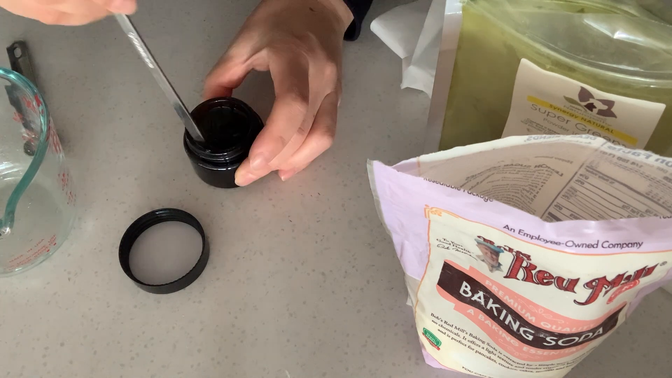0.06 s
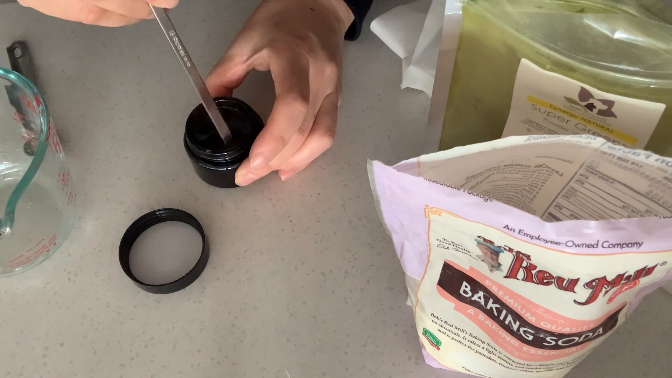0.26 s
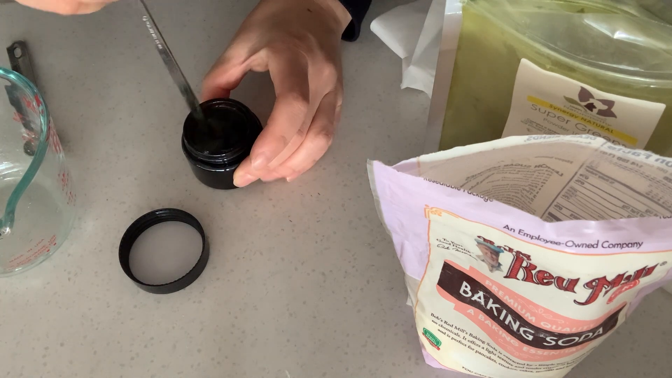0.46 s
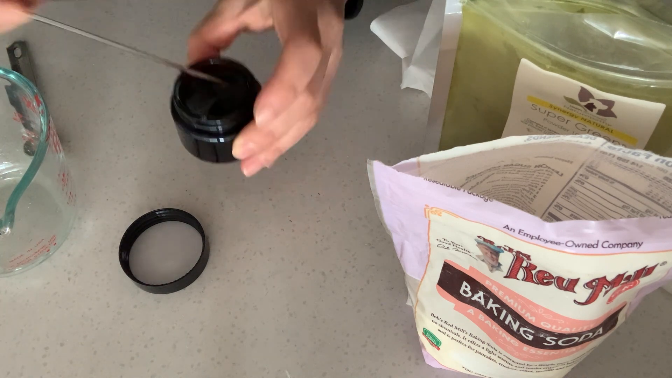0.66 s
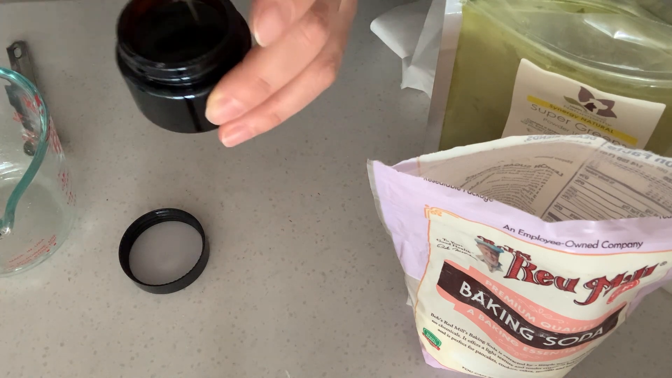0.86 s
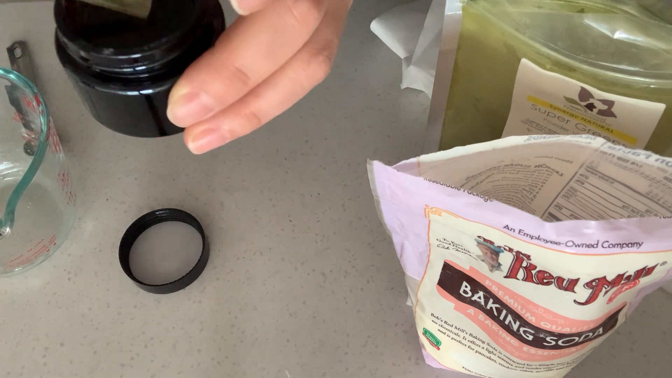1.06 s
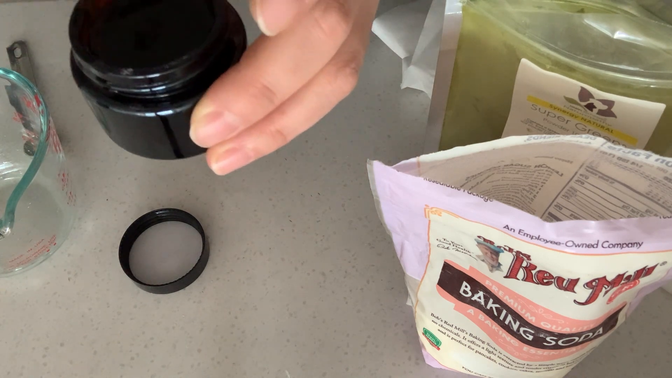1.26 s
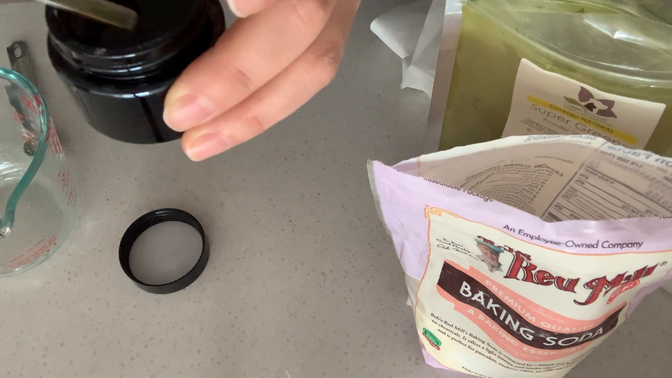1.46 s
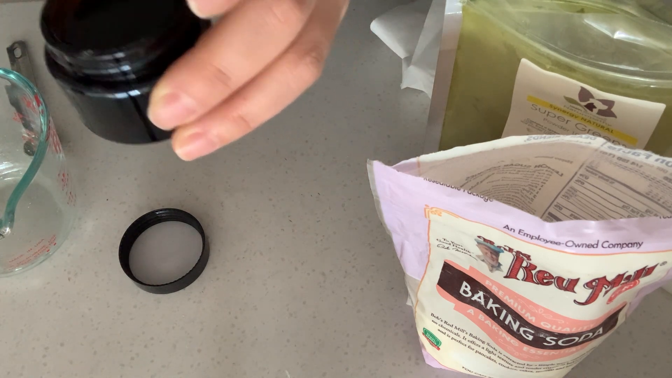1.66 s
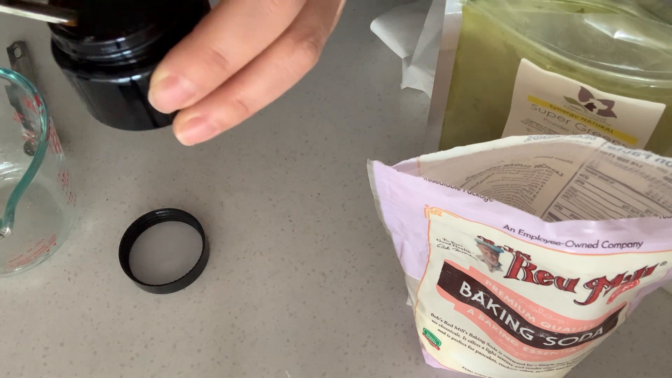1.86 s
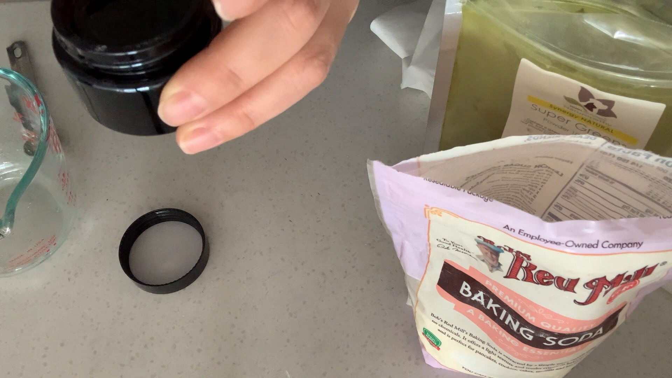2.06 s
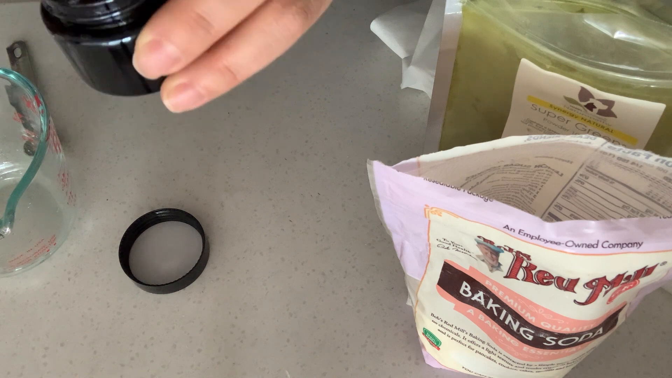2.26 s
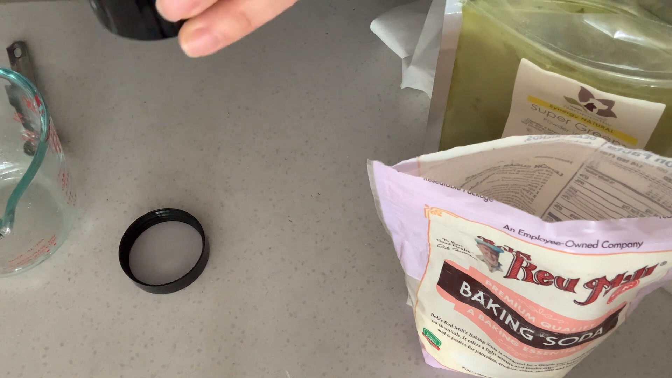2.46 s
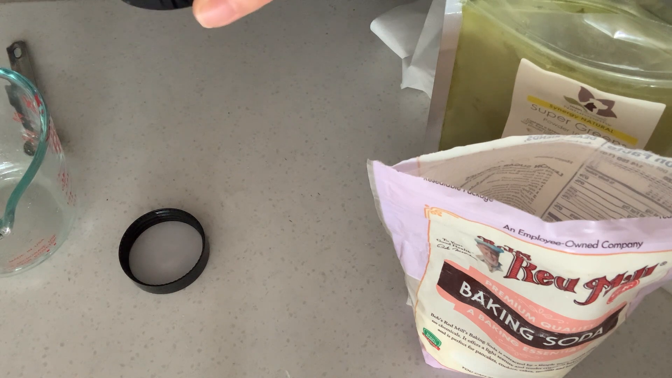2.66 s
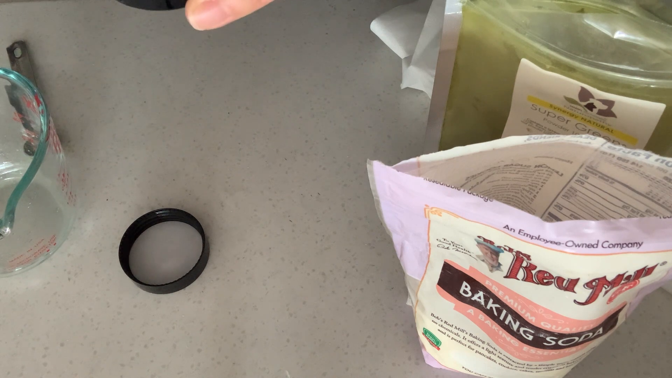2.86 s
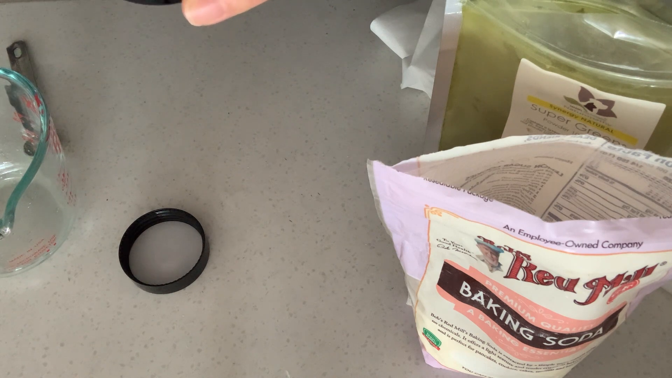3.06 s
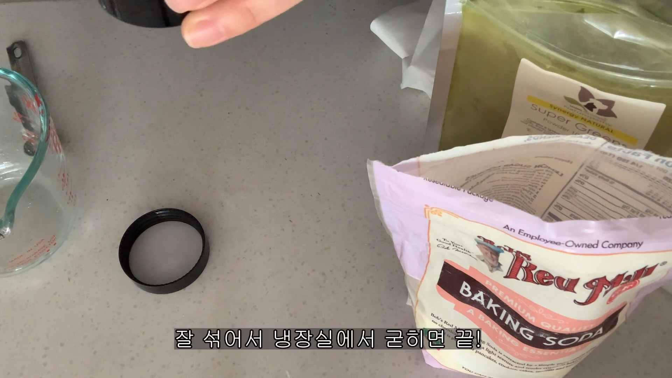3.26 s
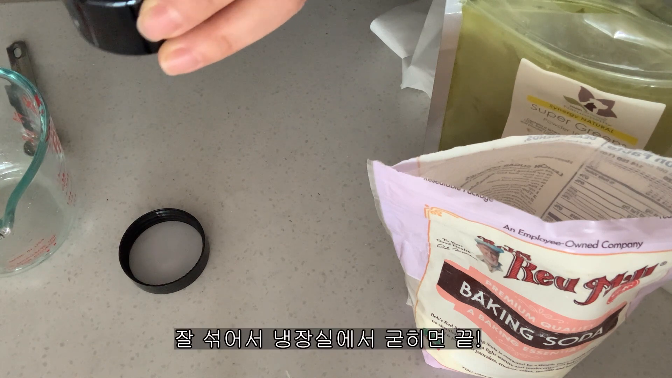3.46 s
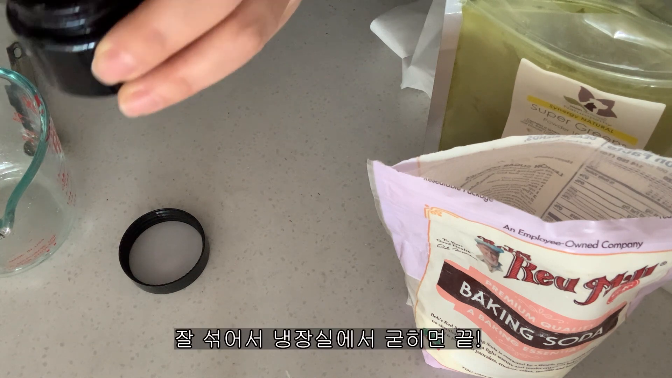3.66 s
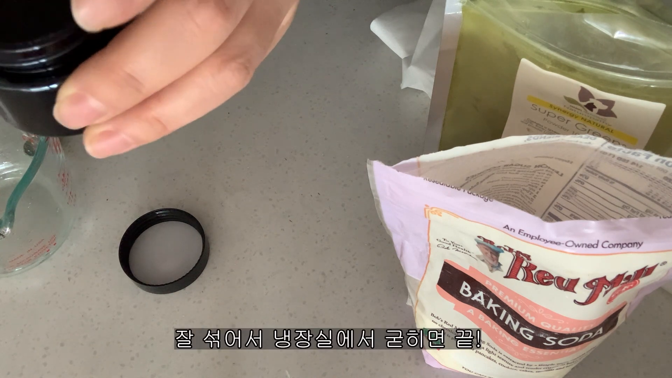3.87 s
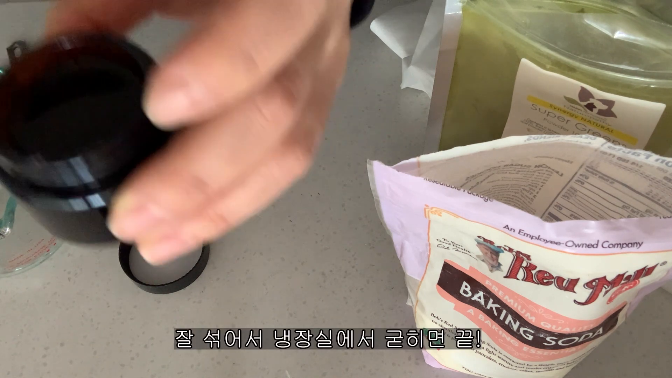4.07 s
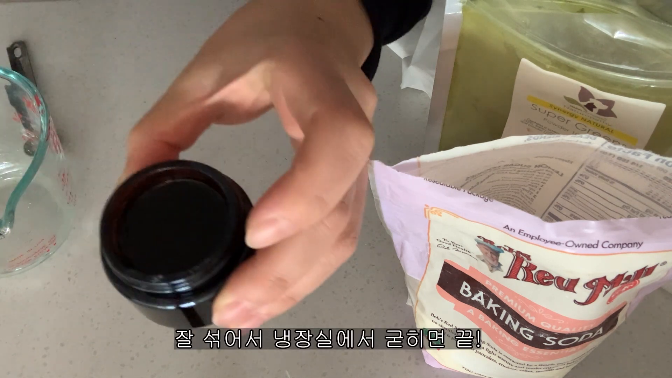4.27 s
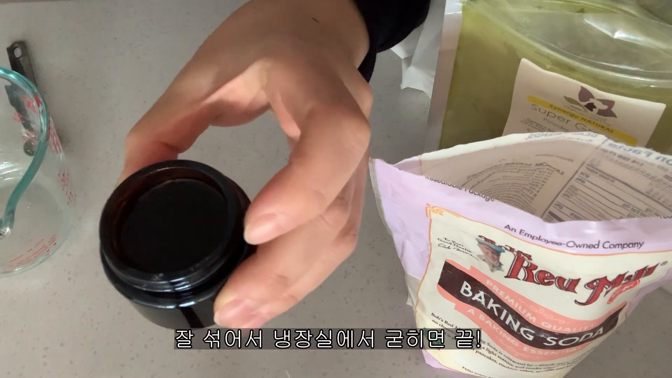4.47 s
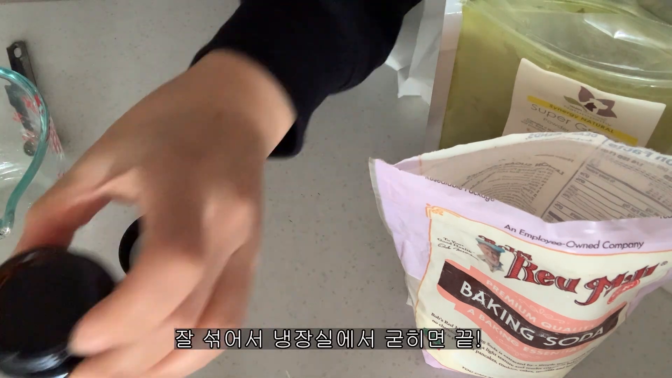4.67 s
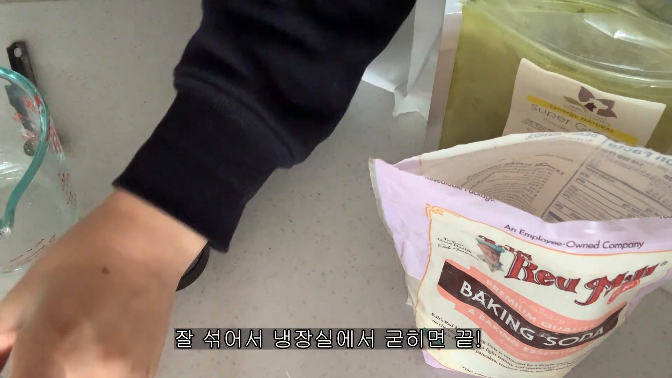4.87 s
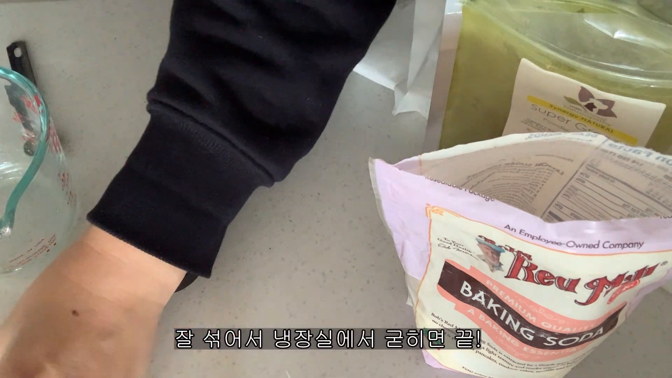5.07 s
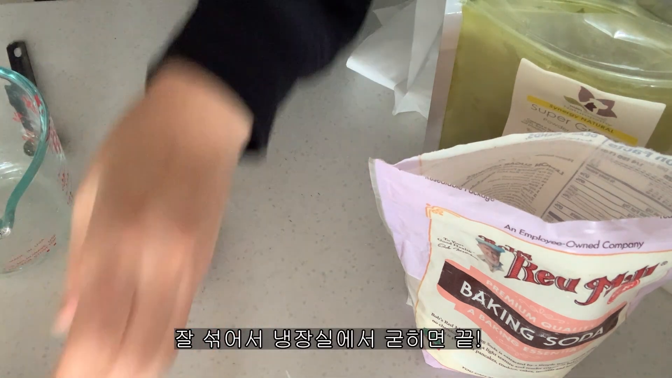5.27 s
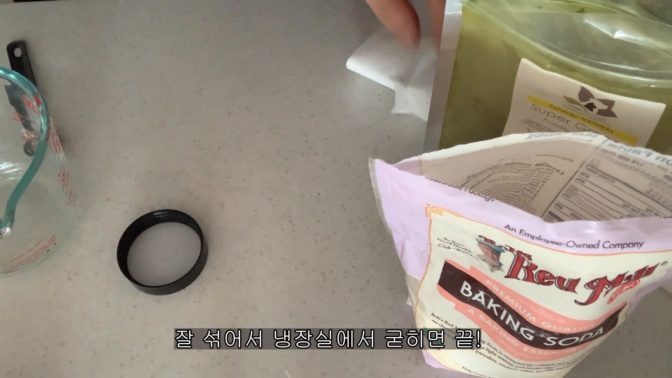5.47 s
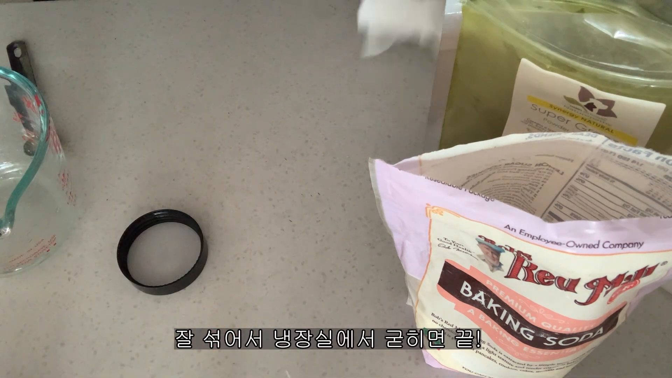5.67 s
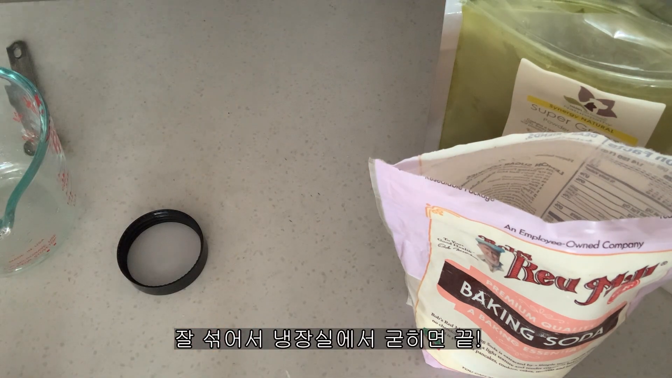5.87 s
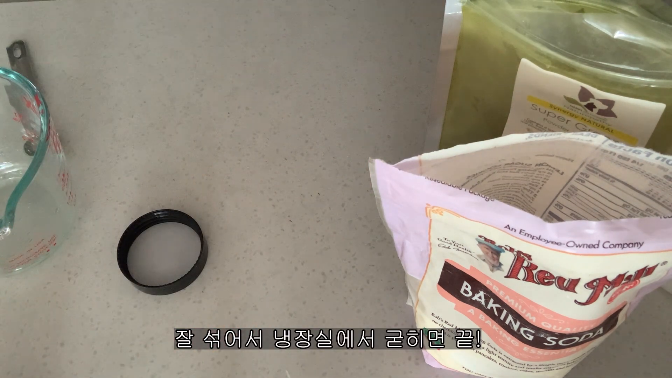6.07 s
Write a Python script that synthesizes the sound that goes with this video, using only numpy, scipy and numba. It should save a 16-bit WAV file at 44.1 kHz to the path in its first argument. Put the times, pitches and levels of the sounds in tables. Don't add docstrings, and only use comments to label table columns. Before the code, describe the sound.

A small glass jar knocks on a counter, a steel spoon ticks and scrapes inside it, then a hard clack and paper rustle over fridge hum.

```python
import sys
import numpy as np
from scipy import signal
from scipy.fft import rfft, irfft
from scipy.io import wavfile
from scipy.ndimage import uniform_filter1d
from numba import njit

SR = 44100
rng = np.random.default_rng(int(sys.argv[2]) if len(sys.argv) > 2 else 0)


def volts_from_db(level):
    exponent = np.asarray(level, float) / 20
    return 10 ** exponent


def persist_wave(psi):
    counts = np.round(np.clip(psi, -1, 1) * 32767).astype(np.int16)
    wavfile.write(sys.argv[1], SR, np.atleast_2d(counts).T)


N = 269892
T = np.arange(N) / SR
HZ = np.maximum(np.fft.rfftfreq(N, 1 / SR), 1)
HALVES = np.array([[0.5], [-0.5]])
EDGE_S = 0.0065


def read(points, hz=HZ):
    f, v = np.transpose(points)
    return np.interp(np.log(hz), np.log(np.maximum(f, 1)), v)


def unit(x):
    return x / np.sqrt(np.mean(x ** 2))


def band(x, lo_hz, hi_hz):
    return signal.sosfilt(signal.butter(2, [lo_hz, hi_hz], "band", fs=SR, output="sos"), x)


@njit
def svf(x, hz, width):
    y, b, l = np.empty(len(x)), 0., 0.
    for i in range(len(x)):
        g, k = np.tan(np.pi * hz[i] / SR), width / hz[i]
        v = (b + g * (x[i] - l)) / (1 + g * (g + k))
        b, l, y[i] = 2 * v - b, l + 2 * g * v, k * v
    return y


def resonance(x, hz, width):
    return svf(x, hz + 0 * T, width)


def walk(rate):
    k = int(SR / rate)
    held = np.repeat(rng.standard_normal(N // k + 1), k)
    return unit(uniform_filter1d(held, k)[:N])


def ring(modes, spread_db, crack_db, crack_s, tail_db, lo_hz, hi_hz, detune=0.01):
    t = np.arange(8192) / SR
    hz, db, t60 = np.transpose(modes)[:, :, None]
    chance = rng.standard_normal((3, len(modes), 1))
    strength = volts_from_db(db + spread_db * chance[0]) * np.sign(chance[1])
    tones = strength * np.sin(2 * np.pi * hz * (1 + detune * chance[2]) * t)
    tones = np.sum(tones * volts_from_db(-60 * t / t60), axis=0)
    fade = np.exp(-t / crack_s) + volts_from_db(tail_db) * np.exp(-t / crack_s / 6)
    crack = rng.standard_normal(len(t)) * fade
    crack[0] += 8.0
    crack = band(band(crack, lo_hz, hi_hz), lo_hz / 2, hi_hz)
    blow = tones / np.abs(tones).max() + volts_from_db(crack_db) * crack / np.abs(crack).max()
    return blow / np.abs(blow).max()


def add(out, s, blow, pan_db):
    i = int(s * SR)
    blow = blow[:N - i]
    out[:, i:i + len(blow)] += blow * volts_from_db(pan_db * HALVES)


def ports(x, lead):
    turn = np.exp(.5j * read(lead))
    return irfft(rfft(x) * np.array([turn, turn.conj()]), N)


def columns(rows):
    s, *cols = np.transpose(rows)
    gate = uniform_filter1d(1. * ((T > s[0]) & (T < s[-1])), size=350)
    return [gate] + [np.interp(T, s, c) for c in cols]


def swipes(rows, edge_s):
    gain = 0
    for s, length, first_db, last_db in rows:
        times = [s - edge_s, s, s + length, s + length + edge_s]
        levels = [first_db - 15.5, first_db, last_db, last_db - 13]
        gain = gain + volts_from_db(np.interp(T, times, levels, -140, -140))
    return gain


# (time [s], peak level [dB], dull jar knock [dB],
# jar pitch [Hz] and steel pitch [Hz] that this spot wakes most)
TICKS = [(1.107, -32, -45.5, 3650, 7300), (1.4664, -26.5, -50, 2300, 7085),
         (1.7874, -28.5, -41, 3470, 7470), (1.8367, -48, -60.5, 2300, 10030),
         (1.943, -53, -80.5, 1880, 7340), (2.2375, -28, -50, 2200, 6930),
         (2.2903, -43.5, -40.5, 3840, 5880), (2.453, -48, -63, 1830, 5980),
         (2.5254, -45.5, -55.5, 3040, 6500), (2.9976, -58.5, -87, 1830, 9800),
         (3.0305, -29.5, -48.5, 3460, 9530), (3.1028, -59.5, -88, 1900, 9900),
         (3.3788, -22.5, -46, 4330, 10920), (3.6219, -20, -40, 4080, 9860),
         (3.6773, -37.5, -77, 1900, 5720), (3.8307, -46, -79.5, 1880, 4540),
         (4.272, -77.5, -61, 2150, 5200), (4.9224, -65, -58.5, 1980, 4540), (5.1862, -66, -77, 1880, 5480),
         (5.1972, -64, -79, 1837, 8000), (5.233, -59, -93, 1840, 7220)]
# (pitch [Hz], level [dB], time to fade 60 dB [s])
SPOON_MODES = [(5140, -11.5, 0.028), (7220, -13, 0.015), (8380, -9.5, 0.0064), (9360, -8, 0.024),
               (10420, 6, 0.012), (10720, -3, 0.035), (12100, -7, 0.016), (15030, -5, .016)]
# (pitch [Hz], level [dB], time to fade 60 dB [s])
HELD_JAR_MODES = [(1500, -16.5, 0.003), (2474, 1.5, 0.015), (2724, -8.5, 0.033), (3760, -2.5, 0.025)]
# (time [s], left minus right [dB])
HELD = [(1.1, -2), (3.0, -3), (3.4, -5), (3.9, -2), (4.2, 0)]


def spoon_ticks():
    out = np.zeros((2, N))
    for s, db, knock_db, jar_hz, steel_hz in TICKS:
        steel_modes = SPOON_MODES + [(steel_hz, -4, .012)]
        jar_modes = HELD_JAR_MODES + [(jar_hz, 1.5, .02)]
        tick = volts_from_db(db + 3.5) * ring(steel_modes, 1.8, 2.4, 0.0012, -19.0, 0.71 * steel_hz, 16500)
        knock = volts_from_db(knock_db + 7.5) * ring(jar_modes, 0.97, 0, 0.0028, -15, 680, 6500)
        add(out, s, tick + knock, np.interp(s, *np.transpose(HELD)))
    return out


def chatter_gain():
    gain = np.zeros(N)
    for s, db, *_ in TICKS:
        gain += (T > s) * volts_from_db(db - 29) * np.exp(-np.abs(T - s) / 0.008)
    return gain


# (start [s], time to hardest push [s], time to lift-off [s], push level [dB], last whistle pitch [Hz])
SCRAPES = [
    (1.115, 0.055, .15, -69, 6700),
    (1.475, 0.061, 0.12, -63, 7180),
    (1.797, 0.059, 0.15, -63, 6890),
    (2.247, 0.041, 0.044, -58.5, 5950),
    (2.46, 0.011, 0.045, -85, 5990),
    (2.533, 0.017, 0.032, -77, 7070),
    (3.04, .125, .2, -68.5, 7900),
    (3.39, 0.036, 0.057, -58, 7200),
    (3.633, 0.028, 0.061, -60, 6820),
    (3.84, .012, 0.027, -75, 4900),
]
SLACK_SHARE = 0.37


def whistle_pitch():
    start_hz = 4900
    climb = []
    for s, push, lift, _, last_hz in SCRAPES:
        top_s = min(push + 0.024, lift)
        for late, share in ((.36 * push, 0), (push, .65), (top_s, 1)):
            climb.append((s + late, start_hz + share * (last_hz - start_hz)))
    hz = np.interp(T, *np.transpose(climb))
    return hz * (1 + 0.042 * walk(60))


def drag_sounds():
    burst = np.minimum(rng.exponential(size=N), 4.5)
    grit = rng.standard_normal(N) * volts_from_db(3.9 * burst + 1.4 * walk(150))
    steel = unit(sum(volts_from_db(d) * resonance(grit, f, 200.) for f, d, _ in SPOON_MODES[4:6]))
    top = resonance(grit, 15000, 700.) + volts_from_db(-11.5) * resonance(grit, 12300, 500.)
    top = unit(top + volts_from_db(-17.5) * band(grit, 11500, 16000)) * volts_from_db(-6.5)
    hiss = unit(band(band(grit, 4900, 13000), 4500, 11500))
    hz = whistle_pitch()
    whistle = unit(svf(svf(grit, hz, 650.), hz, 1200.)) * volts_from_db(3.0 * walk(70))
    body = unit(svf(svf(grit, .42 * hz, 300.), .42 * hz, 700.))
    body = unit(body + .2 * unit(band(grit, 1900, 3200)))
    return steel, top, hiss, whistle, body


def stroke_force(s, push, lift, db):
    last_db = -170 * (lift - push)
    times = [-.004, 0, SLACK_SHARE * push, push, lift, lift + 0.023]
    levels = [-15, -1, -5.5, 0, last_db, last_db - 25]
    return volts_from_db(db + np.interp(T - s, times, levels, -90, -90))


# (start [s], length [s], first level [dB], last level [dB])
SHIVER = [
    (.125, 0.017, -73, -90),
    (.3, 0.022, -68, -75),
    (.355, 0.031, -74, -80),
    (.398, 0.018, -81, -79),
    (.485, 0.048, -74, -69.5),
]
STROKE_WHISTLE_DB = [1, 4, -0.5, 1, 0, 2, -11, -4, -3, 0]
STROKE_TOP_DB = [-6, -3, 0, -12, -10, -9, -10, 1, 3, -3.5]
# (pitch [Hz], lead [radians])
SPOON_LEAD = [(1200, -2), (2000, -1), (5000, -1.5), (6800, -1.55), (8600, 0.45), (10500, 2), (12500, 5),
              (15000, 7.5)]


def spoon():
    steel, top, hiss, whistle, body = drag_sounds()
    trembling = steel + volts_from_db(-3.0) * top + volts_from_db(-1) * hiss + volts_from_db(-10.0) * body
    out = spoon_ticks() + chatter_gain() * trembling
    for (s, push, lift, db, _), whistle_db, top_db in zip(SCRAPES, STROKE_WHISTLE_DB, STROKE_TOP_DB):
        since = T - s
        stages_s = [SLACK_SHARE * push, push, lift]
        steel_gain = volts_from_db(np.interp(since, stages_s, (-0.5, -1.5, 6)))
        whistle_gain = volts_from_db(np.interp(since, stages_s, (-7, 11.5, 6)))
        body_gain = volts_from_db(np.interp(since, stages_s, (-11, -12.5, -15)))
        steel_gain = steel_gain * volts_from_db(0.74 * min(db + 71, 0))
        whistle_gain = whistle_gain * volts_from_db(whistle_db - 12.0)
        whistle_gain = whistle_gain * min(push / 0.047, 1) ** 2
        ringing = steel + volts_from_db(top_db - 60.0 * np.clip(since, 0, 1)) * top
        drag = steel_gain * ringing + volts_from_db(-3.0) * hiss + whistle_gain * whistle + body_gain * body
        out += stroke_force(s, push, lift, db) * drag
    out += swipes(SHIVER, EDGE_S) * (steel + top + volts_from_db(-7.5) * hiss)
    return ports(out, SPOON_LEAD)


# (time [s], peak level [dB], low level [dB], treble level
# [dB], left minus right [dB])
KNOCKS = [
    (0.1139, -43.5, -62.5, -45.5, -1),
    (0.1885, -35.5, -49.5, -60, -1),
    (0.2971, -30, -46, -35, -1.5),
    (0.3478, -44, -59, -42.5, -1),
    (0.4955, -44, -69, -60, -1),
    (0.5286, -48, -63.5, -48, -3),
    (0.5884, -82.5, -72, -58.5, 2),
    (0.7237, -62.5, -70, -60, 4.5),
    (4.1976, -62.5, -64.5, -85, 3.5),
]
# (pitch [Hz], level [dB], time to fade 60 dB [s])
BASE = [(550, -5.5, 0.17), (830, 0, 0.16), (1017, -1.5, 0.23), (1463, -2.5, 0.11), (1937, -2.5, 0.069),
        (2243, 5, 0.03), (2480, -0.5, 0.064), (3350, -7, 0.052), (4480, -3, 0.086), (4570, -4, 0.029),
        (6400, -0.5, 0.035), (8210, -3, 0.075), (10050, -2, 0.049)]
# (time [s], peak level [dB], low level [dB], treble level [dB], left minus right [dB])
CLACKS = [
    (4.9678, -16.5, -37.5, -19.5, -1.5),
    (4.9766, -22, -33, -17, 0.5),
    (4.9805, -20, -47.5, -28.5, 2),
    (4.9905, -24.5, -40.5, -30.5, -2),
    (4.999, -27, -46, -38, 2.5),
]
# (pitch [Hz], level [dB], time to fade 60 dB [s])
CLACK = [(137, -1.5, 0.084), (234, -2.5, 0.07), (500, -4, 0.1), (1154, -2.5, 0.09), (1320, 0.5, 0.1),
         (1730, -6, 0.13), (2424, -3.5, 0.11), (2760, 1, 0.087), (2910, 3, 0.07), (3140, 1, 0.099),
         (3690, -3, 0.07), (4400, -8, 0.05), (5200, 2.5, 0.042), (5480, 3.5, 0.035)]


def jar_blows():
    out = np.zeros((2, N))
    for events, modes, crack_db, spread_db in ((KNOCKS, BASE, 5.0, 2.2), (CLACKS, CLACK, 3, 1.2)):
        modes = np.array(modes) * [1, 1, .4]
        hz = modes[:, 0]
        low_modes = modes[hz < 1100]
        middle_modes = modes[(hz > 1100) & (hz < 4200)]
        treble_modes = modes[hz > 4200] * [1, 1, .45]
        for s, db, low_db, high_db, pan_db in events:
            low = ring(low_modes, spread_db, crack_db - 3.0, 0.003, -12.0, 450, 1400)
            middle = ring(middle_modes, spread_db, crack_db, .002, -12.5, 1000, 4300, detune=0.0031)
            treble = ring(treble_modes, spread_db, crack_db - 13.0, 0.0015, -17.0, 4000, 9900)
            blow = volts_from_db(low_db + 8.5) * low + volts_from_db(db + 2.0) * middle + volts_from_db(high_db - 2.5) * treble
            add(out, s, blow, pan_db)
    return out


# (start [s], length [s], first level [dB], last level [dB])
SHUFFLE = [
    (.2, 0.076, -55, -89),
    (.303, 0.04, -54, -70),
    (.35, .06, -70, -94),
    (.47, 0.0092, -70, -65),
    (.484, 0.015, -53.5, -54.5),
    (.503, 0.018, -57, -61),
    (.526, 0.024, -59, -66),
    (4.953, 0.013, -60, -38),
]
# (start [s], length [s], first level [dB], last level [dB])
RATTLE = [
    (4.972, 0.15, -37, -71.5),
]
# (time [s], peak level [dB], pitch [Hz], time to fade 60 dB [s])
PINGS = [(0.1892, -55, 4350, .05), (.189, -59, 1500, 0.1), (0.2964, -44, 4570, .025),
         (0.298, -51, 1500, .05), (.2972, -44, 6600, 0.022), (0.3474, -48, 2310, .015),
         (0.348, -50, 6320, .012), (0.4844, -47, 1870, 0.014), (.489, -48.5, 2520, .015),
         (1.8372, -57, 2440, 0.022), (2.29, -50, 2500, .012), (2.525, -53, 2860, 0.011),
         (4.273, -62.5, 2950, 0.021), (4.9677, -13.5, 2877, .008), (4.9863, -28.5, 3600, .02),
         (4.9695, -27, 1157, 0.033), (4.9935, -40, 6400, 0.014)]
# (pitch [Hz], lead [radians])
JAR_LEAD = [(150, 4.5), (500, 0.4), (900, -2), (1300, -1.5), (2000, 0.5), (3400, 1.64), (5000, 0.74),
            (8000, 1.6), (12500, -0.5)]


def jar():
    out = jar_blows()
    grind = rng.standard_normal(N) * volts_from_db(2.2 * walk(200))
    out += swipes(SHUFFLE, EDGE_S) * unit(band(band(grind, 1500, 3300), 1200, 5000))
    rattle = band(band(rng.standard_normal((2, N)), 1300, 4800), 900, 5800)
    out += swipes(RATTLE, EDGE_S) * unit(rattle)
    for s, db, hz, t60 in PINGS:
        pair = [(hz, 0, t60), (1.06 * hz, -5, t60 / 2)]
        add(out, s, volts_from_db(db) * ring(pair, 1, 1, .002, -16, hz * .7, hz * 1.35, detune=.002), -2)
    return ports(band(out, 78, 18000), JAR_LEAD)


# (time [s], peak level [dB], pitch [Hz], time to fade 60
# dB [s], left minus right [dB])
CATCHES = [(1.583, -55.5, 9300, .015, -2), (1.57, -57, 7000, .015, -1.5), (1.7878, -42, 3500, .02, -1.5),
           (1.7878, -44.5, 5100, .012, -1.5), (1.839, -57, 7900, .01, -2), (1.839, -59.5, 5500, .01, -1.5),
           (3.409, -54, 5600, .012, -4), (2.6, -55, 7200, .01, -3), (3.437, -54, 6700, .012, -4.5),
           (3.8, -57.5, 10000, .01, -4), (3.683, -55.5, 7200, .01, -3), (3.678, -50, 5600, .015, -3),
           (3.678, -49, 10500, .02, -3), (1.26, -63, 7000, .012, -2), (3.108, -60, 12800, .015, -2),
           (3.105, -61, 8400, .015, -2.5), (1.9, -56, 5000, 0.007, -1.5), (.4803, -52, 2300, .012, -2),
           (.5, -50, 1400, .015, -2.5), (.512, -55, 2400, .015, -2), (.52, -55.5, 1100, .012, -2),
           (.537, -55, 1700, .015, -2), (.545, -59, 2100, .015, -1.5), (0.17, -54, 2400, .02, -2),
           (.312, -51, 2200, .04, -2), (4.972, -29.5, 1717, 0.08, -1), (4.9695, -27.5, 1325, 0.054, 1),
           (4.981, -26.5, 4800, 0.0089, -1.5), (4.9683, -22, 5300, .008, -2), (2.2915, -52, 15000, .01, -2),
           (2.2915, -52, 5400, .008, -3), (2.526, -51, 7400, .01, -3), (1.467, -55, 1900, .012, -1.5),
           (.53, -53.5, 4400, .015, -1), (.497, -59, 4300, .03, -2), (.49, -54, 3000, .015, -2),
           (0.37, -54, 870, .03, 1.5), (2.454, -58, 12000, .01, -2), (3.031, -49, 3000, .008, -2)]


def catches():
    out = np.zeros((2, N))
    for s, db, hz, t60, pan_db in CATCHES:
        blow = ring([(hz, 0, t60)], 0, -2.2, .0015, -16, hz * .75, hz * 1.3, detune=.001)
        add(out, s, volts_from_db(db) * blow, pan_db)
    stirring = (T > 1) & (T < 4)
    return ports(out * stirring, SPOON_LEAD) + ports(out * ((T < 1) | (T > 4)), JAR_LEAD)


def hand_grain():
    burst = np.minimum(rng.exponential(size=N), 5.0)
    return rng.standard_normal((2, N)) * volts_from_db(2.3 * burst + 1.1 * walk(80))


# (start [s], length [s], first level [dB], last level [dB])
RUSTLE = [
    (5.33, .17, -97, -87.5),
    (5.505, 0.11, -70, -71),
    (5.625, .07, -78, -75),
    (5.705, .16, -84.5, -82),
    (5.755, 0.018, -78.5, -80),
    (5.875, 0.11, -75.5, -78),
    (5.99, 0.082, -75.5, -71.5),
    (6.085, 0.035, -69, -62.5),
]
# (start [s], length [s], first level [dB], last level [dB])
PALM = [
    (5.29, 0.15, -85, -75),
    (5.49, 0.077, -69, -66),
    (5.56, 0.057, -62, -60),
    (5.63, 0.061, -66, -65.5),
    (5.705, 0.11, -77.5, -74.5),
    (5.75, 0.041, -85, -75),
    (5.875, 0.084, -65.5, -66.5),
    (5.97, 0.054, -75, -90),
    (6.09, 0.027, -74, -57),
]
# (pitch [Hz], lead [radians])
HAND_LEAD = [(300, 5.5), (600, -0.5), (2400, -2), (5000, -2), (9000, 0.3), (10500, 3.5), (12500, 1.8),
             (15500, 0.6)]


def paper(grain):
    edge_s = 0.015
    rub = swipes(RUSTLE, edge_s)
    near = grain + 0.48 * grain[::-1]
    crackle = unit(band(grain[0], 8600, 13500))
    crackle = crackle + volts_from_db(-5.5 + 5.0 * walk(9)) * unit(band(grain[0], 14700, 16300))
    crisp = volts_from_db(-2.5 + 2 * walk(14)) * crackle + unit(band(near, 7500, 12000))
    middle = volts_from_db(6 + 1.1 * walk(14)) * unit(band(near, 5000, 8500))
    out = rub * (volts_from_db(4.5 + 1.2 * walk(30)) * crisp + middle)
    pressure = (rub > volts_from_db(-110)) * (rub / volts_from_db(-65.5)) ** 0.56
    out += pressure * volts_from_db(-68.5 + 2 * walk(27)) * unit(band(near, 830, 4230))
    out += swipes(PALM, edge_s) * unit(band(near, 1500, 6000))
    return ports(out, HAND_LEAD)


# (time [s], slip rate [Hz], level [dB])
SQUEAK = [
    (5.31, 996, -90),
    (5.325, 990, -73),
    (5.345, 1010, -73),
    (5.4, 1010, -71),
    (5.45, 973, -75.5),
    (5.468, 1020, -70),
    (5.49, 1020, -67),
    (5.53, 1060, -68),
]
# (multiple of the slip rate, level [dB])
WEAVE = [(2, -9), (3, -13), (4, -1), (5, -8), (6, -3), (8, -11)]
# (time [s], pitch [Hz], level [dB])
GLIDE = [
    (5.315, 6100, -80),
    (5.325, 6250, -68),
    (5.35, 6740, -78),
    (5.4, 7000, -75),
    (5.45, 6590, -83),
    (5.465, 6960, -66),
    (5.49, 6900, -66),
    (5.51, 6930, -76),
]


def squeaks(grain):
    out = np.zeros((2, N))
    gate, hz, db = columns(SQUEAK)
    for k, d in WEAVE:
        line_hz = k * hz * (1 + 0.0078 * walk(9.5))
        line = unit(svf(svf(grain[1], line_hz, 420.), line_hz, 800.))
        out += gate * volts_from_db(db + d - 7.0 + 4.4 * walk(30)) * line
    gate, hz, db = columns(GLIDE)
    out += gate * volts_from_db(db - 7.0) * unit(svf(svf(grain[0], hz, 220.), hz, 500.))
    return out


# (pitch [Hz], level [dB], time to fade 60 dB [s])
BUMP = [(40, -60, 0.11), (62, -71, .15), (102, -41, 0.097), (460.3, -49.5, 0.09), (200, -39, 0.051),
        (626, -29.5, 0.014), (1340, -55, 0.065)]


def bump():
    out = np.zeros((2, N))
    t = T[:8192]
    thud = sum(volts_from_db(d - 60 * t / t60) * np.sin(2 * np.pi * f * t) for f, d, t60 in BUMP)
    add(out, 5.579, thud * (1 - np.exp(-t / 0.0014)) * volts_from_db(2.0), 1.5)
    return out


# (time [s], peak level [dB], pitch [Hz], time to
# fade 60 dB [s])
CREAKS = [(.737, -76, 5500, .02), (.641, -76, 2600, 0.018), (2.112, -75, 5700, 0.081),
          (4.362, -68, 3970, 0.024), (4.363, -69, 8200, 0.012), (4.464, -72, 6100, 0.072),
          (4.634, -70, 8200, 0.047), (5.5, -58, 1650, 0.035), (5.755, -67, 5400, 0.035),
          (6.7, -58.5, 500, 0.028), (6.048, -59, 970, 0.054), (6.116, -55, 1500, 0.012),
          (6.117, -62, 5930, .01), (3.828, -68, 7100, .02), (3.828, -60, 8100, .015), (4.3, -61, 4400, .02),
          (5.68, -64, 1750, .02), (3.861, -60, 13000, .012), (3.695, -57, 6200, .015),
          (5.762, -61, 9000, .02), (5.187, -64, 5600, .025), (5.6, -68, 7200, .02), (0.16, -72, 9400, .012),
          (0.53, -66, 4900, .025), (6.09, -57, 4300, 0.055)]


def creaks():
    out = np.zeros((2, N))
    for s, db, hz, t60 in CREAKS:
        pair = [(hz, 0, t60), (.87 * hz, -4, t60)]
        add(out, s, volts_from_db(db) * ring(pair, 3, 2, .004, -15, hz * .8, hz * 1.2), 0)
    return out


# (time [s], pitch [Hz], level [dB])
HUM = [
    (0.15, 83.1, -38),
    (0.18, 84.84, -39),
    (6.1, 84.92, -38.5),
]
# (pitch [Hz], width [Hz], level [dB])
CABINET = [(254.1, 12, -69), (297.5, 6, -73), (593, 31, -73.5), (801, 16, -73.5), (474, 32, -77),
           (962, 43, -78), (135, 3.3, -72.5), (161.3, 5, -78.5)]
# (pitch [Hz], level per Hz [dB])
AIR = [(30, -14), (60, 0.5), (105, 9), (160, 11), (210, 3.5), (400, -0.5), (520, -0.5), (800, 0.5),
       (1050, -6), (1600, -5), (2000, -10), (2600, -21.5), (4500, -26), (10500, -29.5)]
# (pitch [Hz], likeness [0 to 1])
AIR_ALIKE = [(100, 0.94), (320, 0.32), (450, 0.28), (1200, 0.66), (2400, 0.61), (3400, 0.033), (8000, .15),
             (12500, .9)]
# (pitch [Hz], left minus right [dB])
AIR_PAN = [(100, 6), (200, 6.5), (320, 3.5), (450, -2), (850, 5.5), (1200, -1), (3000, -1.5), (12000, -1)]
# (pitch [Hz], lead [radians])
AIR_LEAD = [(100, 0.44), (300, 0.98), (600, 1.54), (900, 4.8), (2000, 3.27), (16000, 4.64)]


def fridge():
    _, hz, db = columns(HUM)
    phase = 2 * np.pi * (np.cumsum(hz) / SR + .3) + 0.54 * HALVES
    hum = np.sqrt(2) * volts_from_db(db + 0.28 * walk(18.0) - 1.0 * HALVES) * np.sin(phase)
    cabinet = 0
    for f, width, d in CABINET:
        panel = unit(resonance(rng.standard_normal(N), f, 1. * width))
        cabinet = cabinet + volts_from_db(d + 0.5 * walk(1.1)) * panel
    alike = np.clip(read(AIR_ALIKE), 0, .95)
    shared, *own = rfft(rng.standard_normal((3, N)))
    top_loss_db = 40 * np.maximum(np.log2(HZ / 11000), 0)
    colour = volts_from_db(read(AIR) - top_loss_db + read(AIR_PAN) * HALVES)
    air = irfft(colour * (np.sqrt(alike) * shared + np.sqrt(1 - alike) * np.array(own)), N)
    middle_rms = np.sqrt(np.mean(band(air, 350, 3000) ** 2))
    air = air * volts_from_db(-68 + 0.98 * walk(4)) / middle_rms
    return hum + ports(cabinet * volts_from_db(2.4 * HALVES) + air, AIR_LEAD)


# (multiple of the shaft rate, level [dB])
SHAFT = [(4, -76.5), (6, -72), (7, -72), (9, -79.5), (11, -80), (14, -75.5), (15, -80), (18, -78.5),
         (20, -79.5), (22, -83)]


def compressor():
    turns = np.cumsum(columns(HUM)[1] * (1 + .002 * walk(6.0))) / SR / 2
    tones = 0
    for k, db in SHAFT:
        tone = np.sin(2 * np.pi * (round(k) * turns + rng.random()))
        tones = tones + np.sqrt(2) * volts_from_db(db + 2.7 * walk(9.0)) * tone
    return ports(tones * volts_from_db(3 * HALVES), AIR_LEAD)


# (pitch [Hz], time to fade 60 dB [s])
ROOM = [(300, 0.48), (1200, 0.37), (3000, 0.27), (7000, 0.12), (12000, 0.26)]


def room(x):
    t = T[:16384]
    tail = 0
    for hz in 180 * 2 ** np.arange(0, 6.6, .5):
        echo = band(rng.standard_normal((2, len(t))), hz / 1.19, hz * 1.19)
        tail = tail + echo * volts_from_db(-60 * t / read(ROOM, hz))
    tail = tail * np.clip(t / 0.0025, 0, 1)
    tail = tail / np.sqrt(np.sum(tail ** 2, axis=1, keepdims=True))
    return signal.fftconvolve(x, tail, axes=1)[:, :N]


def scene():
    steel, glass = spoon(), jar()
    grain = hand_grain()
    hand = paper(grain) + squeaks(grain) + bump() + creaks()
    echoes = room(volts_from_db(-16.0) * steel + volts_from_db(-7.5) * glass)
    return steel + glass + catches() + hand + fridge() + compressor() + echoes


def low_pass(x):
    return signal.sosfilt(signal.butter(12, 16970, fs=SR, output="sos"), x)


# (pitch [Hz], level [dB])
MID = [(11000, 0), (12400, -4), (13100, -21), (14300, -23), (14900, -8), (16000, -9), (16800, -22)]


def record(dry):
    mid = irfft(rfft(dry[0] + dry[1]) * volts_from_db(read(MID)), N) / 2
    side = (dry[0] - dry[1]) / 2
    start_s, rise_s = .1135, 0.00042
    opening = np.clip((T - start_s) / rise_s, 0, 1)
    mix = np.array([mid + side, mid - side]) * opening
    return low_pass(mix)


dry = scene()
out = record(dry)
persist_wave(out)
```